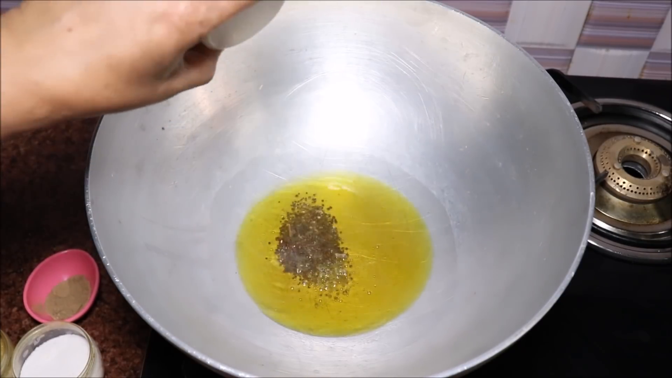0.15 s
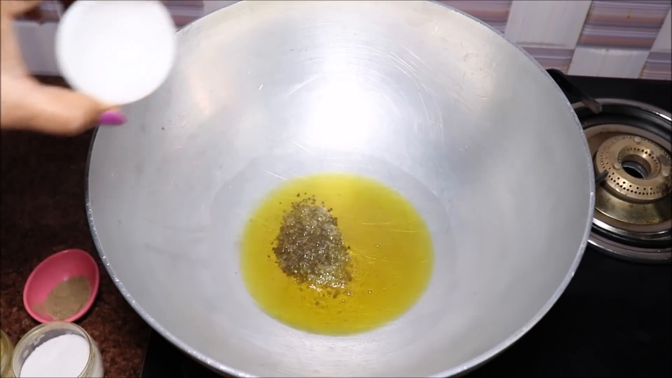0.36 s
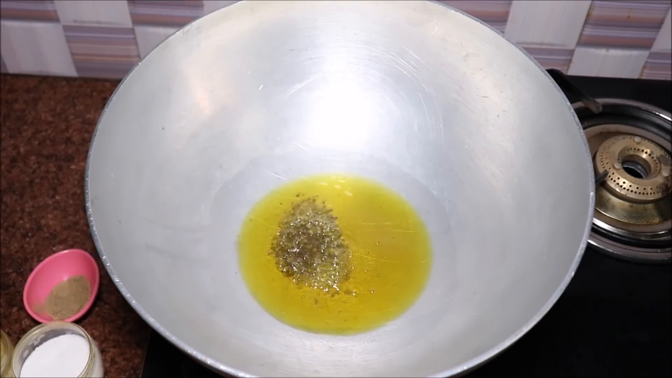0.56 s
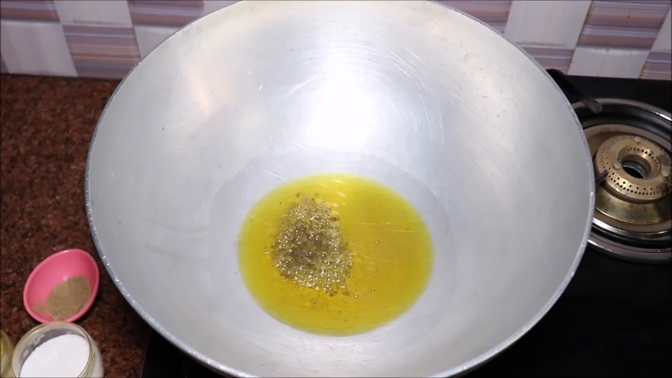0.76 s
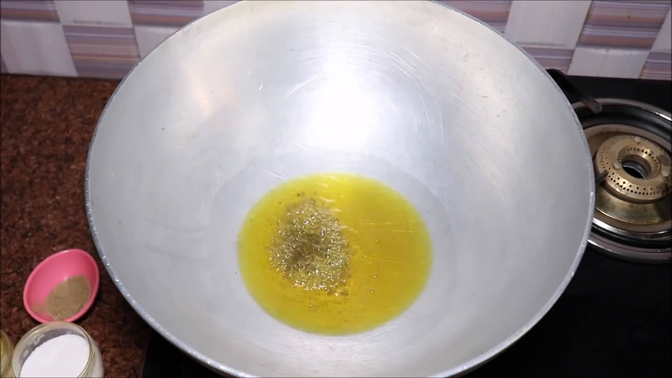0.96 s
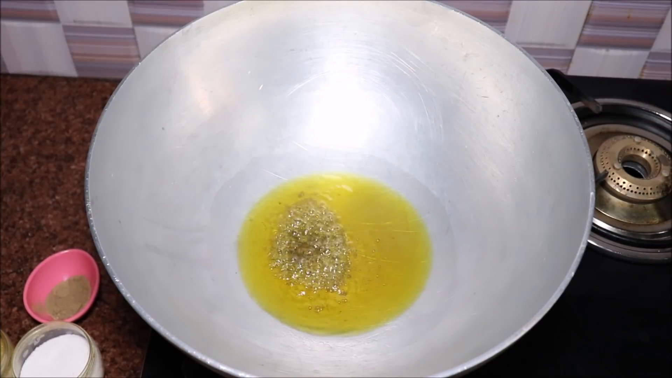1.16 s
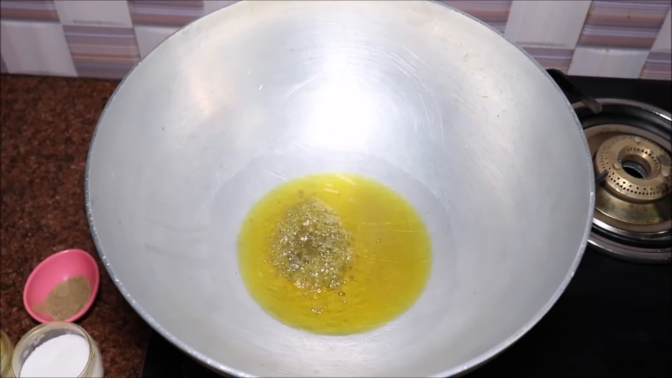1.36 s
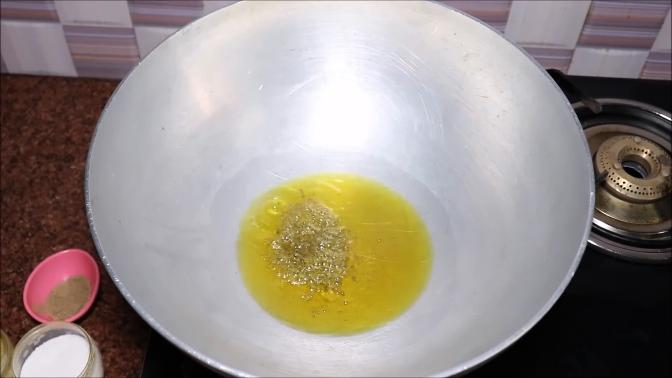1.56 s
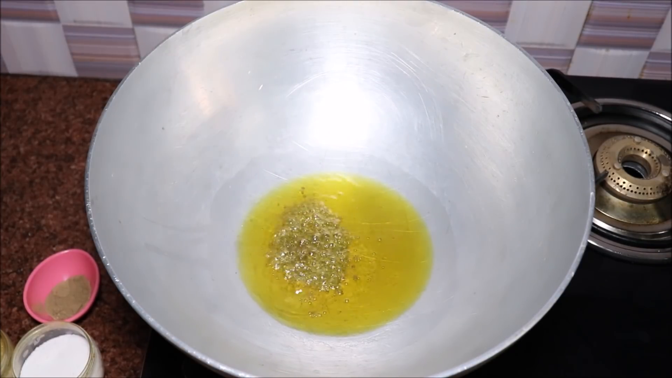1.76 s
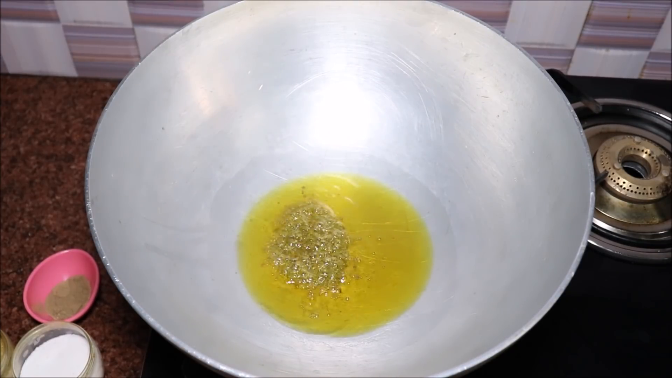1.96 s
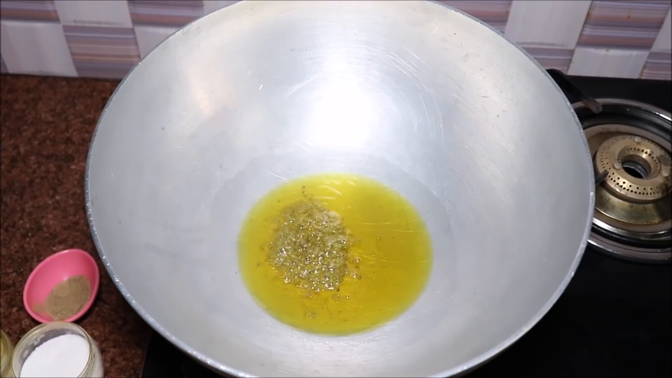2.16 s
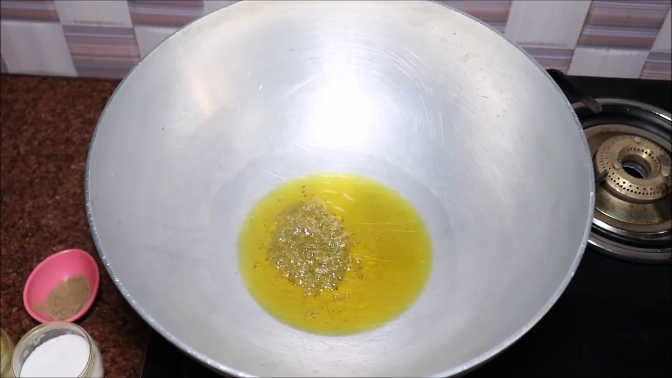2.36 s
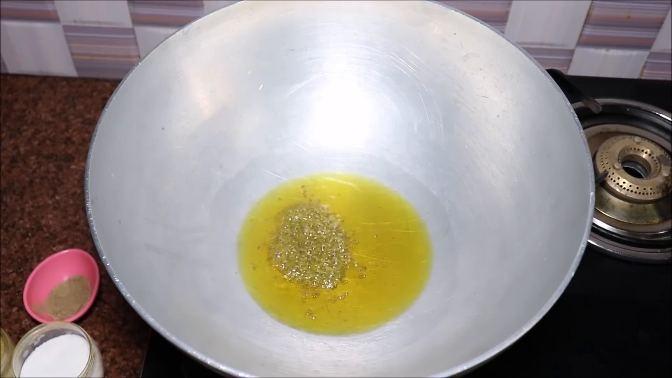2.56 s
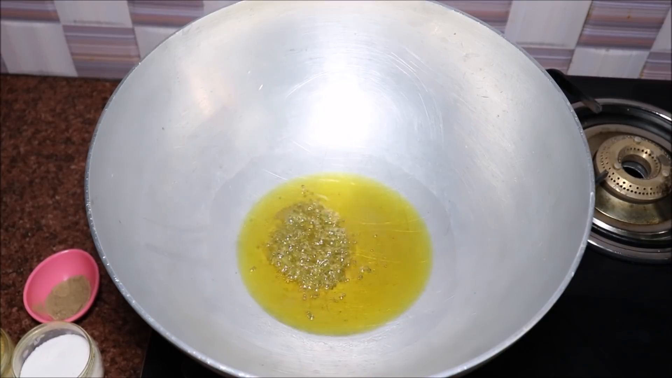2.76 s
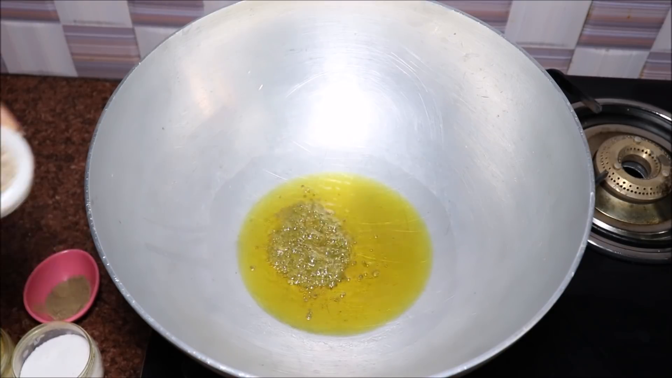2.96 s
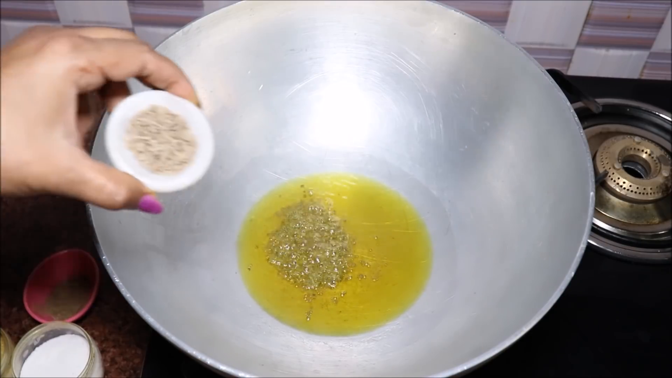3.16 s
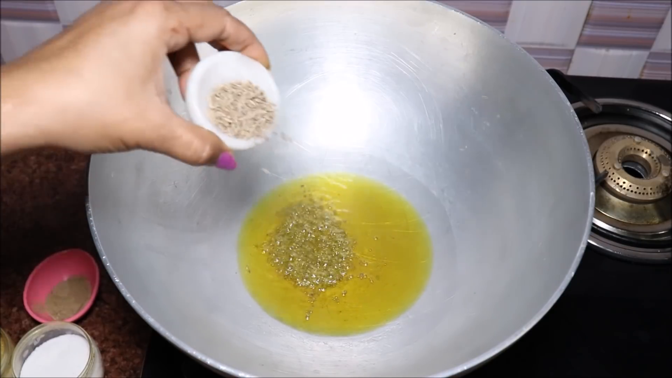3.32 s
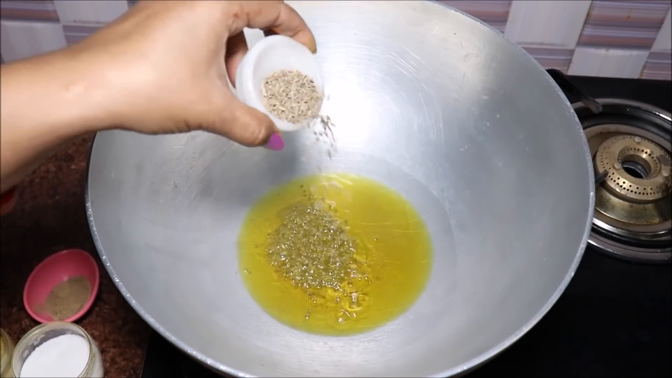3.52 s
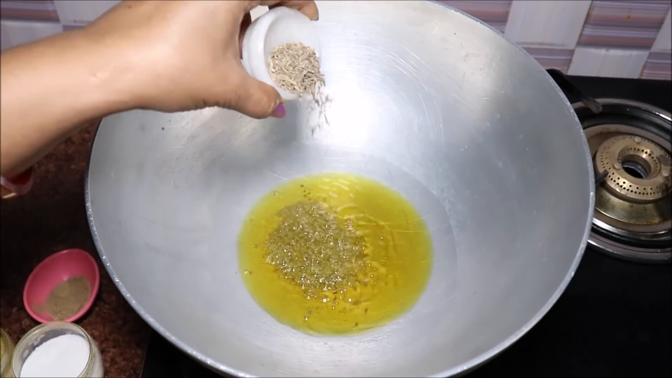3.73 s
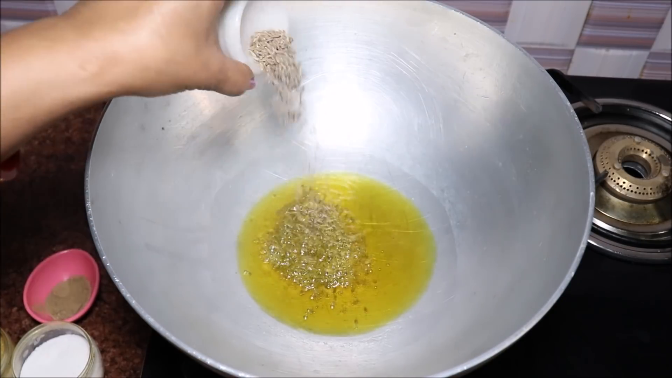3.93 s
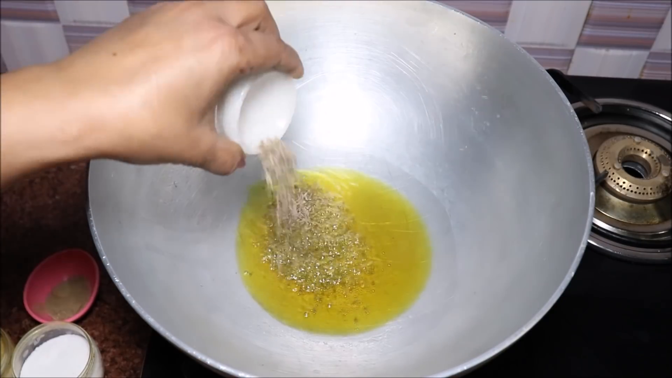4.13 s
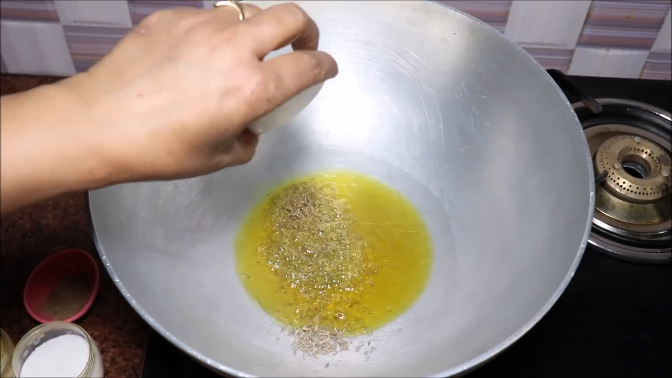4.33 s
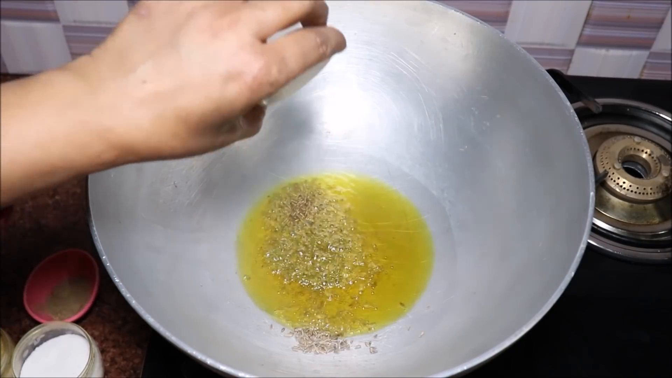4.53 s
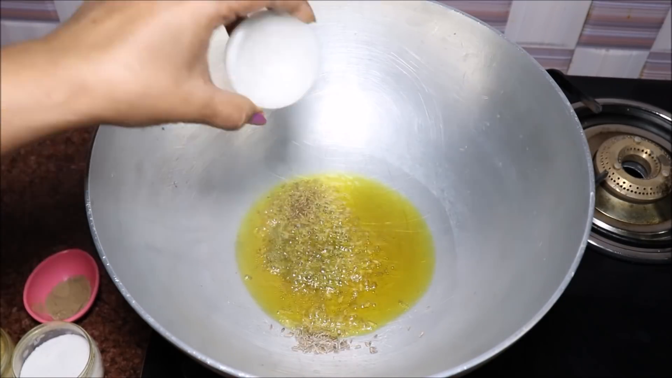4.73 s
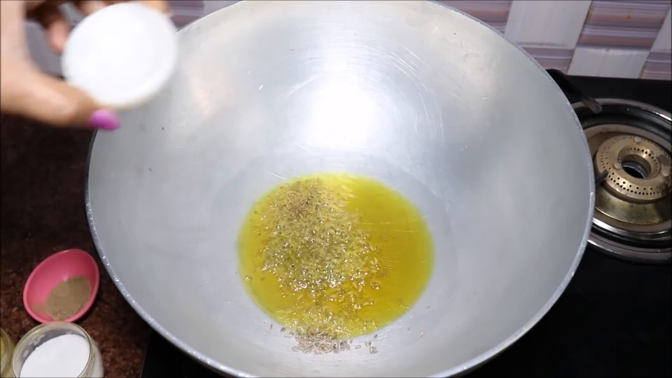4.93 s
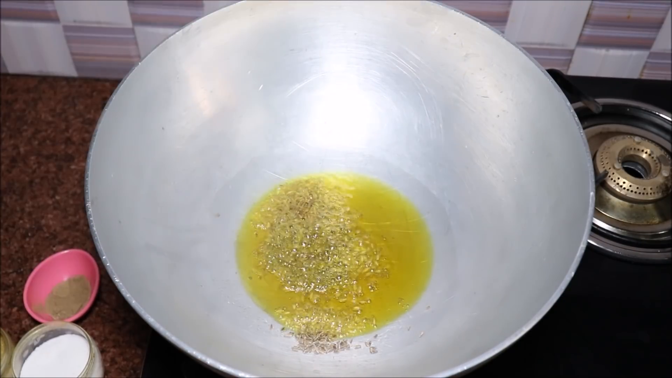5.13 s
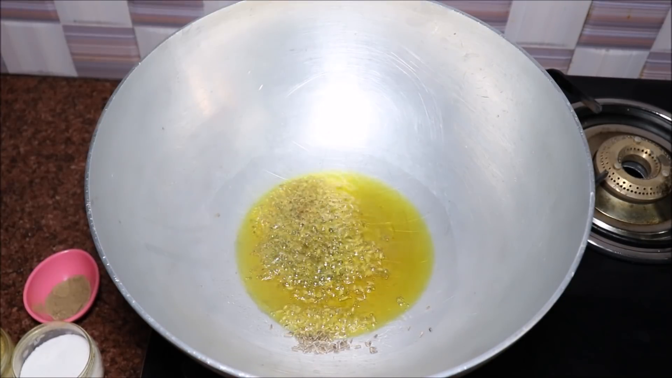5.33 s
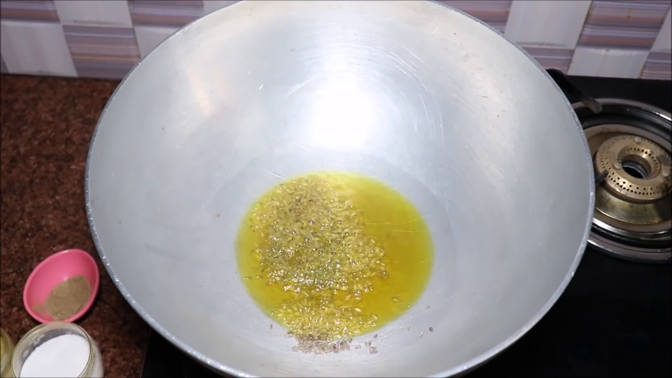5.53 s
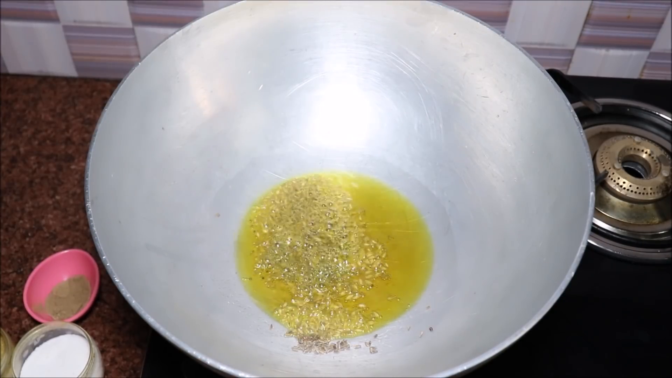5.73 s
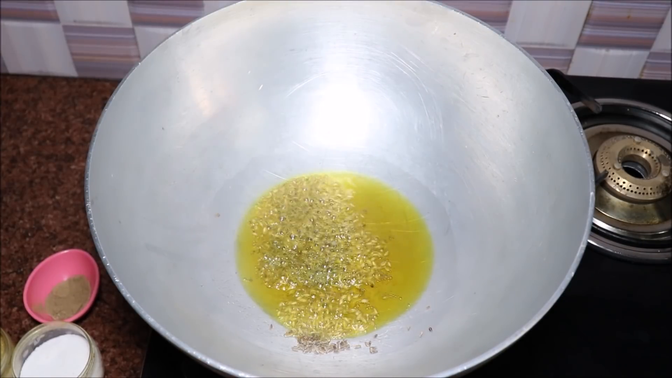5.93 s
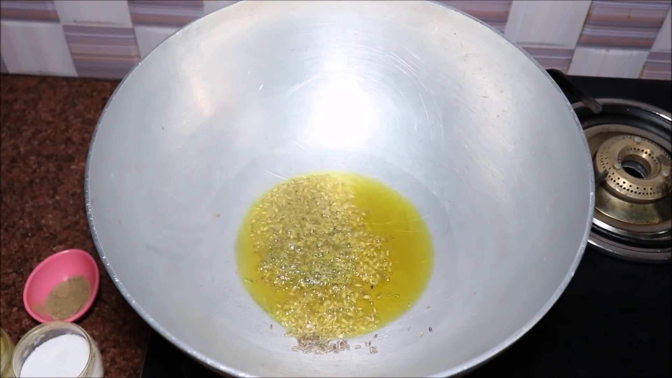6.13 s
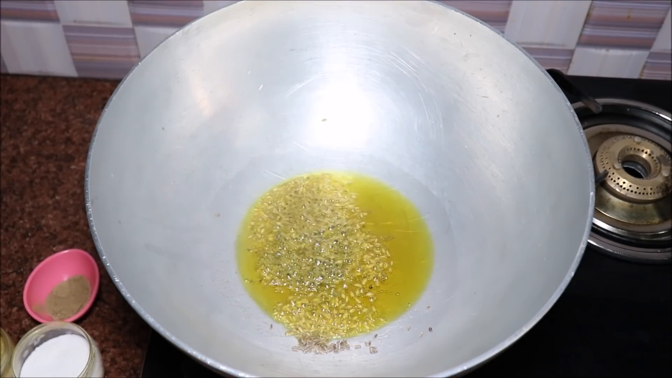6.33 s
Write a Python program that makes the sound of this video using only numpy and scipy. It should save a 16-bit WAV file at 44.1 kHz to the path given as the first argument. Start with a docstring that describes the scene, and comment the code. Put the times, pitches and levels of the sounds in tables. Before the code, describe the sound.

A close stereo take of seeds frying in oil in a large thin metal wok, about 6.5 seconds, in a small tiled kitchen. At 0 the last of a helping ticks in lightly, and within a tenth of a second crowded pops and fine crackle break out over a bright hiss. Until about 1 second it is lively; then it calms, with a faint dull dish knock near 1.3. From 2 to 3.5 pops are sparse, isolated snaps over thin sizzle, with a soft thump of spitting oil at 2.4. Around 3.9 to 4.5 more seeds trickle in, very faintly, and the fizz brightens. From 4.5 crackling thickens; by 5.3 to 6.4 it is dense and strongest, with sharp snaps, hollow metallic pops, several spits against the microphone and a faint knock near 6.1. Low stove rumble is barely there. It stops still frying.

```python
"""Seeds frying in a wok

Spice seeds fry in a pool of hot oil in an aluminium wok, close to the microphone, in a small tiled kitchen.
Steam bursts out in pops: each is a tick that rings a steam pocket and scatters round the bowl.
Fine crackle is many small bursts; the hiss is coloured noise that thins out and swells after a second helping.
A few spits thump the microphone as pressure pulses; a dish or cup knocks softly with a clack and a low ring.
The dry seeds tick and make the metal ring as they are poured in; the stove rumbles low underneath."""
import sys
import numpy as np
from scipy import signal
from scipy.fft import rfft, irfft
from scipy.io import wavfile
from scipy.ndimage import uniform_filter1d

SR = 44100
rng = np.random.default_rng(int(sys.argv[2]) if len(sys.argv) > 2 else 0)


def digitize_waveform(pressure):
    """Quantize a signal to 16-bit integers and store it at the path in sys.argv[1].

    Rows of a 2-D input are taken as channels; values are limited to [-1, 1].
    """
    field = np.atleast_2d(pressure).T
    bounded = np.clip(field, -1, 1)
    quanta = np.round(bounded * 32767).astype(np.int16)
    wavfile.write(sys.argv[1], SR, quanta)


N = 285856


def amp(db):
    """Decibels to gain."""
    return 10 ** (np.asarray(db) / 20)


def unit(x):
    """Scales to rms 1."""
    return x / np.sqrt(np.mean(x ** 2) + 1e-20)


def read(points, hz):
    """Reads a curve of (Hz, value) points on a log-frequency axis."""
    f, value = np.transpose(points)
    return np.interp(np.log(hz + 1), np.log(f + 1), value)


def add(mix, start_s, sound):
    """Mixes a sound in at a start time, cut off at the end of the mix."""
    part = mix[:, max(round(start_s * SR), 0):][:, :sound.shape[-1]]
    part += sound[..., :part.shape[1]]


def causal(db):
    """The response with this gain that starts sharply and then rings out (minimum phase)."""
    cepstrum = irfft(np.log(amp(db)))
    half = cepstrum.shape[-1] // 2
    # fold the second half of the cepstrum on to the first
    cepstrum[..., 1:half] *= 2
    cepstrum[..., half + 1:] = 0
    return np.exp(rfft(cepstrum))


def ports(spectra, hz):
    """Makes two unrelated spectra as alike as scattered sound is at the two microphone ports."""
    # likeness at the two ports: pitch_hz, likeness (0 to 1)
    likeness = [(60, 0.37), (600, 0.74), (1500, 0.61), (3000, 0.17), (5500, 0.19), (9000, 0.13), (15000, 0)]
    same = np.clip(read(likeness, hz), 0, 1)
    right = same * spectra[0] + np.sqrt(1 - same ** 2) * spectra[1]
    return np.array([spectra[0], right])


def wok_db(hz):
    """Lift in dB from the resonances of the air in the bowl."""
    # air resonances: pitch_hz, width_hz, lift_db
    resonances = [(664, 210, 5), (888, 130, 3.5), (1226, 92, 6), (1482, 94, 7.5), (1820, 18, 7),
                  (2150, 134, 3), (2275, 234, 4.5), (2803, 134, 6), (3230, 43, -1), (3880, 110, 2),
                  (5550, 490, 3)]
    return sum(db / (1 + (2 * (hz - f) / width) ** 2) for f, width, db in resonances)


def boil(s):
    """How hard the oil boils, in dB: it calms as the first seeds dry out and rises with the second helping."""
    # vigour of the boil: time_s, level_db
    vigour = [(0, -3.5), (.3, -3), (.75, -2), (1.1, -7.5), (1.9, -8), (2.5, -11), (3.5, -12), (4.4, -6),
              (5, -1.5), (5.7, 0), (6.48, 0)]
    return np.interp(s, *np.transpose(vigour))


def warmth(s, cold_db=14, warm_s=0.051):
    """Bubbling in dB: it follows the boil once the first seeds have had a moment to heat up."""
    return boil(s) - cold_db * np.exp(-(s / warm_s) ** 2)


def bed(spectrum, grain_db, ring):
    """Noise of tiny uneven impulses with a given colour and share of the wok's resonances, at rms 1."""
    hz = np.fft.rfftfreq(N, 1 / SR)
    grain = unit(uniform_filter1d(rng.standard_normal(N), size=40))
    impulses = rng.standard_normal((2, N)) * amp(grain_db * grain)
    colour = amp(read(spectrum, hz) + ring * wok_db(hz))
    return unit(irfft(ports(rfft(impulses), hz) * colour, N))


def rumble(level_db=-67):
    """The stove's low rumble: steady noise weighted to the bass."""
    # colour of the rumble: pitch_hz, relative level_db (per Hz)
    spectrum = [(20, -26), (45, -15), (95, 2), (150, -4.5), (240, -1.5), (400, -4.5), (900, -16),
                (2000, -118), (8000, -70)]
    return amp(level_db) * bed(spectrum, grain_db=-2, ring=0.4)


def kitchen(x, first_s=0.0016):
    """Diffuse echoes from tiles and counter, each band dying at its own speed."""
    # echo decay: pitch_hz, time to fall by 60 dB (s)
    decay = [(200, 0.42), (900, 0.19), (2500, 0.21), (5000, 0.2), (9000, 0.24), (15000, 0.14)]
    hz, t, z = signal.stft(rng.standard_normal((2, SR // 2)), SR, nperseg=256)
    # ports() wants frequency on the last axis
    z = ports(z.transpose(0, 2, 1), hz).transpose(0, 2, 1)
    z = z * amp(-60 * t / read(decay, hz)[:, None])
    tail = signal.istft(z, SR, nperseg=256)[1]
    # the echoes build up over the first moments
    tail *= 1 - np.exp(-(np.arange(tail.shape[1]) / SR / first_s) ** 2)
    return signal.fftconvolve(x.mean(0)[None], tail / np.linalg.norm(tail[0]), axes=1)[:, :N]


def dish(ring_db=-9, clack_db=-2, clack_s=0.027, chatter=0.28):
    """Dull knocks of a dish or cup being handled: a clack and a short low ring that chatters."""
    # knocks: start_s, level_db
    knocks = [(1.338, -40), (4.42, -56), (6.078, -44)]
    # ringing of the knocks: pitch_hz, level_db, time to fall by 60 dB (s)
    modes = [(163.4, -3, 0.3), (236, -2.5, 0.34), (340, -1.5, 0.43), (556, -10, 0.068), (825, -8, 0.056),
             (965, 10.5, 0.054)]
    out, t = np.zeros((2, N)), np.arange(SR // 2) / SR
    dull = signal.butter(2, [170, 1600], "band", fs=SR, output="sos")
    onset = 1 - np.exp(-t / 0.001)
    for start_s, db in knocks:
        ring = np.zeros(len(t))
        for hz, level, t60 in modes:
            ring += amp(level - 60 * t / t60) * np.sin(2 * np.pi * (hz * t + rng.random()))
        ring *= 1 + chatter * unit(uniform_filter1d(rng.standard_normal(len(t)), size=400))
        clack = unit(signal.sosfilt(dull, rng.standard_normal(len(t)))) * np.exp(-t / clack_s)
        add(out, start_s, amp(db) * (amp(ring_db) * ring + amp(clack_db) * clack) * onset)
    return out


def metal(x):
    """The thin aluminium wall rings with its modes when struck."""
    # wall modes: pitch_hz, level_db, time to fall by 60 dB (s)
    modes = [(1740, -6, 0.73), (2350, 4, 0.058), (2720, -14, 0.17), (2680, 9, 0.069), (3920, 5, 0.11),
             (5050, 7.5, 0.093), (5000, -14, .2), (5500, -11, 0.094), (5500, -18, 0.099)]
    t = np.arange(SR // 2) / SR
    ring = np.zeros((2, len(t)))
    for hz, db, t60 in modes:
        ring += amp(db - 60 * t / t60) * np.sin(2 * np.pi * (hz * t + rng.random((2, 1))))
    return signal.oaconvolve(x, ring / np.linalg.norm(ring[0]), axes=1)[:, :N]


def pour(per_s=1500, ring_db=0, tick_db=-2, tick_hz=4300):
    """A stream of light seeds from the cup: each gives a tiny tick and stirs the metal."""
    # strength of the stream: time_s, level_db
    stream = [(0, -38), (.07, -40.5), (.16, -40.5), (.32, -80), (3.9, -50), (4.05, -54), (4.3, -56),
              (4.5, -69)]
    hits = rng.standard_normal((2, N)) * (rng.random(N) < per_s / SR)
    ticks = signal.sosfilt(signal.butter(2, [tick_hz, 9000], "band", fs=SR, output="sos"), hits)
    flow = amp(np.interp(np.arange(N) / SR, *np.transpose(stream)))
    return flow * (amp(tick_db) * unit(ticks) + amp(ring_db) * unit(metal(hits)))


def spits(push_s=0.00092, rise_s=0.00032, gain_db=6):
    """A droplet of oil landing by a port gives one push and pull of pressure."""
    # spits: start_s, level_db (before gain_db), left-minus-right_db
    droplets = [(1.545, -30.5, -8), (1.8005, -28.5, -8), (2.4225, -16, -23), (5.3593, -10.5, -19),
                (5.6882, -17, -20), (5.784, -26.5, -10), (5.9688, -21, -16)]
    out, t = np.zeros((2, N)), np.arange(2000) / SR
    push = (1 - t / push_s) * np.exp(-t / push_s) * (1 - np.exp(-t / rise_s))
    for start_s, db, pan_db in droplets:
        add(out, start_s, amp(db + gain_db) * amp([[pan_db], [0]]) * push)
    return signal.sosfilt(signal.butter(1, 55, "high", fs=SR, output="sos"), out)


def hiss(sizzle_db=-44.5, sizzle_follow=0.79, fizz_db=-46, fizz_follow=0.82, surge_db=3.0):
    """Foam round the seeds: a sizzle in the bowl and a finer fizz above it, both in small surges."""
    # colours of sizzle and fizz: pitch_hz, relative level_db (per Hz)
    sizzle_colour, fizz_colour = [(200, -10.5), (550, -7), (1050, -6.5), (1500, 0), (2300, 2), (3200, 1.5),
                                  (5000, 3.5), (7000, -5), (10000, -31), (16000, -27)], [(2000, -23), (5000, -8), (7500, 2), (10500, -2),
                                                  (13000, -3), (15800, -8)]
    # wet seeds fizz brightly as each helping lands: middle_s, half_length_s, lift_db
    helpings = [(0.06, 0.058, 4), (4.217, 0.24, 6)]
    t = np.arange(N) / SR
    surge = surge_db * unit(uniform_filter1d(rng.standard_normal((2, N)), size=1600))
    fresh = sum(db * np.exp(-((t - s) / length) ** 2) for s, length, db in helpings)
    sizzle_level = amp(sizzle_db + sizzle_follow * warmth(t) + surge[0])
    fizz_level = amp(fizz_db + fizz_follow * boil(t) + fresh + surge[1])
    sizzle = sizzle_level * bed(sizzle_colour, grain_db=5.5, ring=0.8)
    fizz = fizz_level * bed(fizz_colour, grain_db=-2.0, ring=0)
    return sizzle + fizz


def wok(x):
    """The bowl colours every burst and rings on briefly."""
    # colour of the bursts as they leave the bowl: pitch_hz, level_db
    bowl = [(40, -28), (150, -22.5), (380, -25.5), (540, -11), (1050, -11.5), (1350, -4.5), (2000, -2),
            (3600, 2), (4800, 1.5), (6300, -0.7), (8300, -1), (11000, -6.5), (15000, -4)]
    hz = np.fft.rfftfreq(8192, 1 / SR)
    response = irfft(causal(read(bowl, hz) + wok_db(hz)))
    return signal.oaconvolve(x, response[None], axes=1)[:, :N]


def bursts(rows, sharpness=2.25, steepness=1.11, reach=28.0, seat_db=2.04, mirror=0.48, mirror_s=0.000836,
           lag_s=0.000016, pan_db=-0.5, scatter_db=2.0, scatter_s=0.003, linger_db=-16, linger_s=0.025,
           dull_hz=11000):
    """Each burst is one tick that rings its steam pocket and then scatters round the metal bowl."""
    start_s, db, pitch, snap_db = np.transpose(rows)[:, :, None]
    t = np.arange(2048) / SR
    hz = np.fft.rfftfreq(2048, 1 / SR) + 1  # 1 Hz up, to avoid dividing by zero
    chance = rng.standard_normal((len(rows), 3, len(t))).transpose(1, 0, 2)
    # the direct tick reaches the left port a little earlier
    lag = np.array([0, lag_s])[:, None, None]
    tick = np.exp(-2j * np.pi * hz * lag) * amp(pan_db * chance[:2, :, :1])
    # the curved floor of the wok mirrors it twice within a millisecond
    delay = mirror_s * (0.078 + rng.random((len(rows), 2, 1)))
    mirrored = mirror * np.exp(-2j * np.pi * hz * delay).sum(1)
    tick = tick * (1 + mirrored) / np.sqrt(1 + 2 * mirror ** 2)
    # reflections off the wall follow; those that circle the bowl linger; both lose some treble
    fade = np.exp(-t / scatter_s) + amp(linger_db) * np.exp(-t / linger_s)
    fade = fade * (1 - np.exp(-t / 0.0014))
    scatter = ports(rfft(chance[:2] * fade / np.linalg.norm(fade)), hz)
    scatter = scatter * amp(scatter_db) / np.hypot(1, hz / dull_hz)
    # power of the ringing pocket and of the husk's snap; big pockets open more slowly
    pocket = (1 + (sharpness * (hz / pitch - pitch / hz)) ** 2) ** -steepness
    snap = amp(snap_db) ** 2 / (1 + (hz / (reach * pitch)) ** 2)
    # every spot in the bowl favours its own frequencies
    smoother = signal.windows.hann(44)[None]
    seat = unit(signal.oaconvolve(chance[2, :, :len(hz)], smoother, "same", axes=1))
    colour = causal(10 * np.log10(pocket + snap) + seat_db * seat)
    sounds = irfft((tick + scatter) * colour) * amp(db) / np.sqrt(1 + amp(scatter_db) ** 2)
    out = np.zeros((2, N))
    for k, start in enumerate(start_s[:, 0]):
        add(out, start, sounds[:, k])
    return out


def crackle(count=620, level_db=-16, follow=1.0, spread_db=3.0, pitch_hz=3700, octaves=0.57, snap_db=-15):
    """Many small bubbles at random times, louder where the oil boils harder."""
    when, size, pitch = rng.random((count, 3)).T
    s = when * N / SR
    db = level_db + follow * warmth(s) - spread_db * np.log(0.051 + size)  # a few are much louder
    pitches = pitch_hz * 2 ** (2 * octaves * (2 * pitch - 1))
    return bursts(np.transpose([s, db, pitches, snap_db + 0 * s]))


def small_pops(count=170, level_db=-1, spread_db=4.0, crowding=0.9, follow=1.0, pitch_hz=3000, octaves=0.77,
               snap_db=-15, snap_spread_db=5):
    """Lesser pops at random: more of them, and stronger, the harder the oil boils."""
    when = (np.arange(count) + rng.random(count)) / count
    size, pitch, snap = rng.uniform(-0.92, 1, (count, 3)).T * np.sqrt(3)
    t = np.arange(N) / SR
    # pops due so far: this count climbs faster while the oil bubbles harder
    due = np.cumsum(amp(crowding * warmth(t)))
    s = np.interp(when, due / due[-1], t)
    db = level_db + follow * warmth(s) + spread_db * size
    pitches = pitch_hz * 2 ** (octaves * pitch)
    return bursts(np.transpose([s, db, pitches, snap_db + snap_spread_db * snap]))


def big_pops():
    """The pops that stand out: steam bursting from a seed rings its pocket as the husk snaps."""
    # pops: start_s, level_db, steam pocket pitch_hz, broadband husk snap_db (beside the pocket)
    pops = [(0.069, 7, 4060, -38), (0.0904, 14, 3160, -42), (.1533, 10.5, 2220, -39),
            (0.1634, 8, 4350, -32), (.1701, 10.5, 2340, -36.5), (.2063, 7, 4470, -28),
            (0.2123, 10.5, 2590, -26), (0.2428, 14, 2180, -29.5), (0.2722, 3, 4170, -28),
            (0.3243, 6.5, 2530, -20), (.3328, 7.5, 4240, -35), (0.3571, 14.5, 2100, -38),
            (0.3717, 9, 2310, -34), (0.3894, 13, 3150, -33), (0.44, 14.5, 1690, -29),
            (.4452, 4.5, 4000, -13), (.5177, 12, 2250, -36), (0.5514, 8.5, 1660, -27),
            (0.5765, 4, 3400, -11.5), (0.6213, 4.5, 2290, -13), (0.6394, 4.5, 4360, -7),
            (0.6658, 8, 2760, -26), (0.6937, 8, 2740, -16), (0.709, 9.5, 11800, -14),
            (0.7264, 11, 3430, -29), (0.743, 12, 1990, -19), (0.765, 5, 4440, -12),
            (0.7829, 7.5, 3130, -16), (.7985, 10.5, 1840, -14), (.8315, 4.5, 2800, -11),
            (0.8762, 6, 2680, -8), (0.9155, 7, 1680, -20), (.9269, 4, 1800, -10.5),
            (0.9997, 15, 12400, -12.5), (1.0033, 14.5, 2320, -36), (1.0695, 6, 5040, -15.5),
            (1.0753, 4, 1750, -22), (1.0987, 6.5, 1540, -16.5), (1.1485, 10.5, 1750, -11.5),
            (1.257, 5.5, 5800, -22), (1.29, 9, 1520, -23), (1.3244, 2, 1740, -11), (1.3388, -0.5, 4150, -6),
            (1.42, 0, 2380, -6.5), (1.4331, 7, 2000, -8.5), (1.5286, 2.5, 1940, -9),
            (1.5446, 13, 12000, -16), (1.5683, -5.5, 4000, -0.5), (1.6301, 8, 1880, -15.5),
            (1.6465, 14.5, 2370, -21), (1.7121, -1.5, 3190, -6), (1.7362, 2, 5560, -18),
            (1.7669, 3.5, 2840, -11), (1.8017, 8, 11200, -12.5), (1.893, 2.5, 3900, -2.5),
            (1.932, 5, 3100, -10), (1.9406, 8.5, 1500, -22), (1.9571, 17.5, 2220, -14),
            (2.03, 5.5, 1640, -14), (2.0894, 9.5, 1610, -12), (2.1365, 0.5, 3080, -9.5),
            (2.1647, -2, 8200, -12), (2.209, 7.5, 1640, -14.5), (2.269, -4.5, 11500, -4),
            (2.3739, 2, 1580, -17), (2.4226, 14.5, 11700, -18), (2.474, 8, 1690, -32),
            (2.5019, 5.5, 1870, -12), (2.5195, 0, 3250, -9), (2.6444, 2.5, 2070, -11.5),
            (2.6836, -2, 2350, 1.5), (2.8335, -2, 2550, -2), (2.8628, 1.5, 2110, -16),
            (2.9354, 17, 4900, -17), (3.0771, 1, 2540, -6.5), (3.0977, 3, 7450, -7.5),
            (3.259, 5.5, 2240, -5), (3.3048, 3.5, 2580, -15), (3.3417, 9, 10300, -20),
            (3.3689, -2, 1900, -16), (3.4248, 5, 1950, -12), (3.5623, 13.5, 2300, -13),
            (3.6701, 8.5, 4350, -9.5), (3.7731, 14.5, 2050, -10.5), (3.7847, 3.5, 4550, -20),
            (3.8772, 11, 2940, -12.5), (3.9027, 11, 4270, -19), (3.962, 4.5, 6200, -19),
            (4.026, -1.5, 2540, -3), (4.1034, 5.5, 3170, -13), (4.1305, 9, 2150, -15),
            (4.1418, 5.5, 5400, -21), (4.172, 11, 2500, -15), (4.1859, 12, 3030, -12),
            (4.219, 5, 1650, -11), (4.316, 5, 2080, -8), (4.358, 6.5, 1610, -14), (4.3874, 4, 9000, -6.5),
            (4.391, 10.5, 2830, -7), (4.4697, 11, 2900, -7), (4.5141, 7.5, 2220, -13),
            (4.5458, 1.5, 3680, 1.5), (4.574, 8, 9500, -4.5), (4.6016, 3, 11500, -20),
            (4.6168, 10, 1580, -20), (4.6791, 6, 11400, -12), (4.7018, 3, 11500, -18),
            (4.7248, -2.5, 5530, 0), (4.7395, 8.5, 2380, -6.5), (4.7802, 9.5, 10800, -6.5),
            (4.8214, 10, 10640, -15), (4.843, 14.5, 2000, -10), (4.8866, 3.5, 3600, -12),
            (4.9019, 15, 1690, -16.5), (4.9304, 2.5, 3820, -11), (4.9885, 10, 11500, -15.5),
            (4.9978, 9, 4370, -18), (5.021, 6.5, 4660, -8), (5.0328, 8.5, 2620, -9.5),
            (5.0579, 10.5, 2980, -10), (5.0795, 5.5, 11400, -5.5), (5.1344, 6, 2680, -16),
            (5.1627, 5.5, 6400, -23), (5.1984, 8, 3850, -10), (5.2503, 14.5, 1800, -11),
            (5.284, 6.5, 4370, -24), (5.2989, 10, 8800, -29), (5.3035, 13.5, 4400, -21),
            (5.3587, 15, 12000, -21), (5.3998, 8.5, 6700, -6.5), (5.4885, 8.5, 1910, -10.5),
            (5.4945, 10.5, 5570, -17), (5.507, 10, 2210, -10.5), (5.544, 5, 11500, -21),
            (5.5803, 5, 3750, -7), (5.5958, 16, 2400, -18), (5.61, 6.5, 2580, -3.5),
            (5.6244, 7.5, 11500, -3), (5.63, 15, 2610, -33), (5.6715, 14, 2200, -14),
            (5.6885, 9.5, 11800, -7), (5.7052, 14, 2430, -8.5), (5.757, 13.5, 6400, -26),
            (5.7834, 12.5, 10500, -32), (5.8103, 5, 6770, -23), (5.83, 5.5, 3270, -15),
            (5.84, 11, 9850, -17), (5.8826, 12, 11500, -29), (5.8994, 12, 11500, -17),
            (5.9061, 1.5, 2480, 0.5), (5.9662, 10.5, 12000, -10.5), (5.9833, 13, 2080, -15),
            (6.0243, 7, 7500, -27), (6.0792, 16, 2020, -23), (6.14, 16, 4340, -16), (6.1543, 17, 2820, -15),
            (6.1736, 11.5, 1540, -11), (6.1792, 9.5, 9000, -1), (6.2097, 14.5, 9600, -13),
            (6.2369, 6.5, 3930, -7), (6.2571, 9.5, 2640, -13), (6.275, 7.5, 3280, -26),
            (6.3377, 1, 3200, -2.5), (6.3488, 5, 2220, -14), (6.3778, 0.5, 6000, -11),
            (6.4086, -3.5, 4310, 1), (6.4638, 3.5, 3760, -2.5)]
    return bursts(pops)


def scene(room_db=-8.0):
    """The frying and the knocks in the kitchen, over the low rumble of the stove."""
    near = wok(big_pops() + small_pops() + crackle()) + pour() + dish()
    return near + amp(room_db) * kitchen(near) + hiss() + spits() + rumble()


def record(dry, edge_hz=16050):
    """The left port is duller than the right; then a low-pass filter limits the band."""
    hz = np.fft.rfftfreq(N, 1 / SR)
    # left minus right: (Hz, dB)
    balance_db = read([(100, 1.5), (5000, -1.0), (8500, -0.1), (12000, -3.5), (15500, -6.0)], hz)
    coloured = irfft(rfft(dry) * amp(np.array([balance_db, -balance_db]) / 2), N)
    low_pass = signal.firwin(255, edge_hz, window=("kaiser", 8), fs=SR)
    return signal.oaconvolve(coloured, low_pass[None], "same", axes=1)


dry = scene()
out = record(dry)
digitize_waveform(out)
```